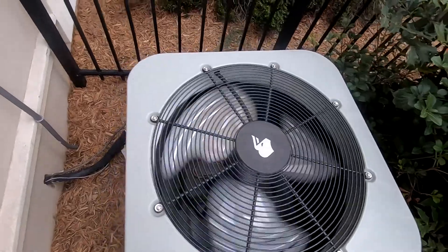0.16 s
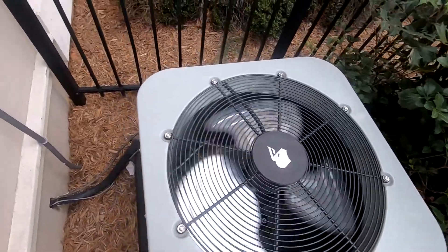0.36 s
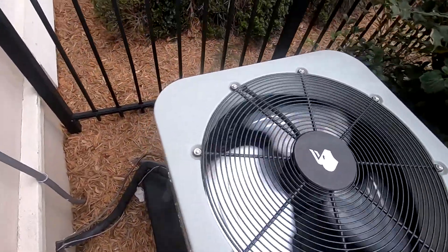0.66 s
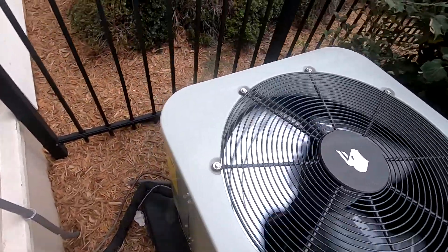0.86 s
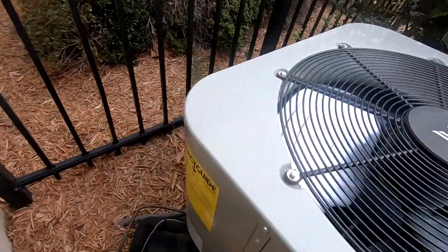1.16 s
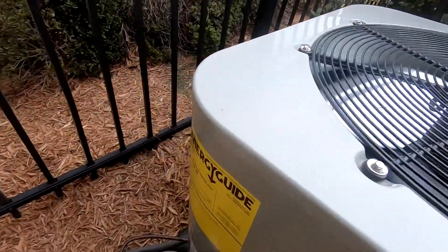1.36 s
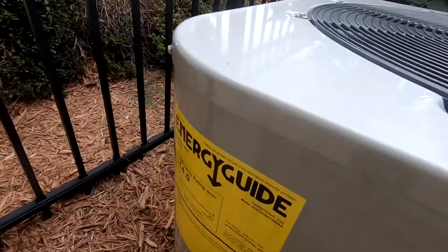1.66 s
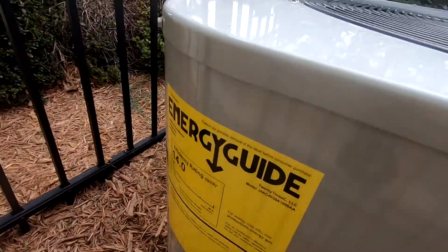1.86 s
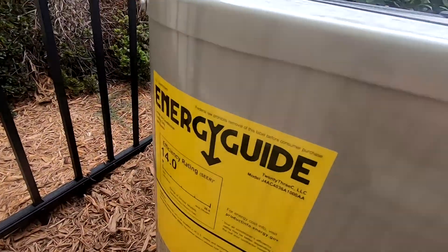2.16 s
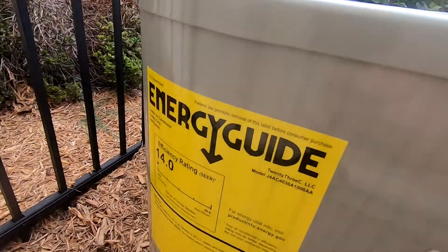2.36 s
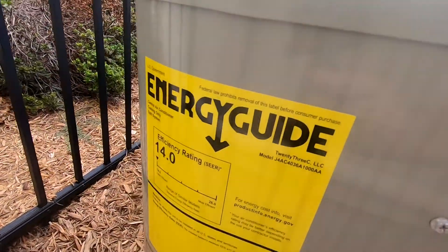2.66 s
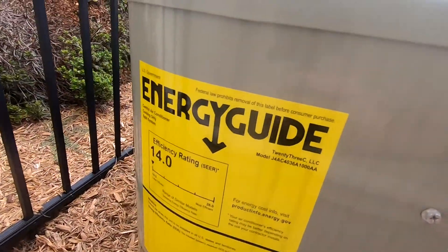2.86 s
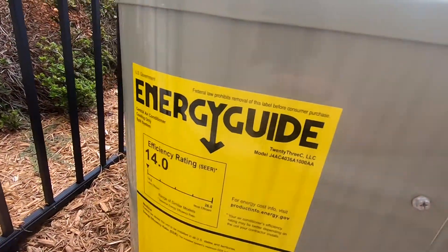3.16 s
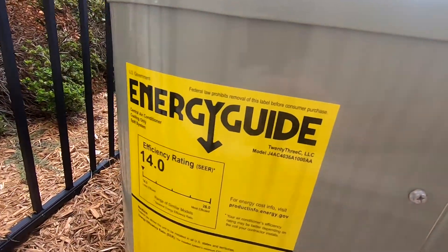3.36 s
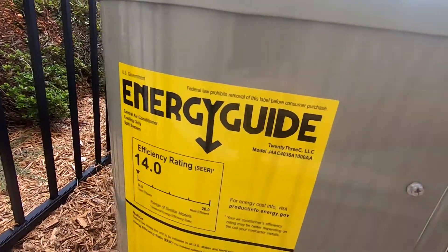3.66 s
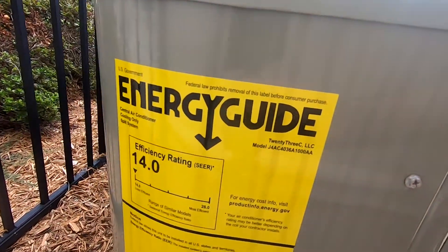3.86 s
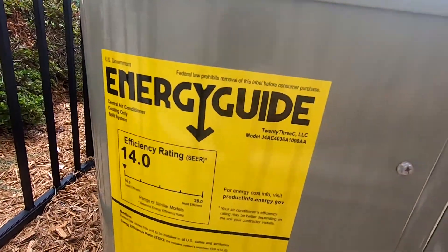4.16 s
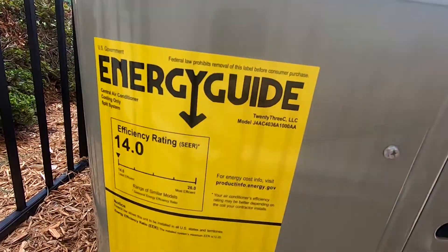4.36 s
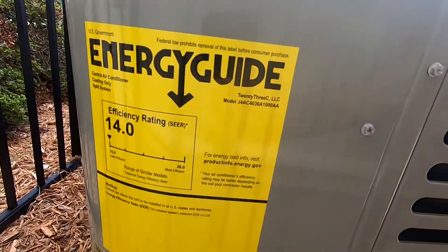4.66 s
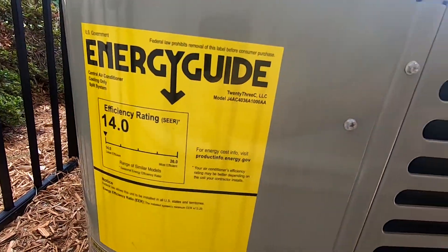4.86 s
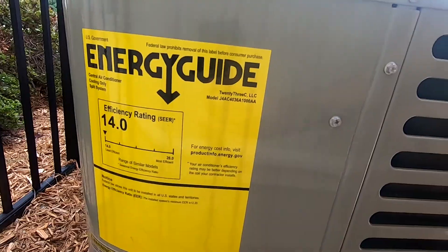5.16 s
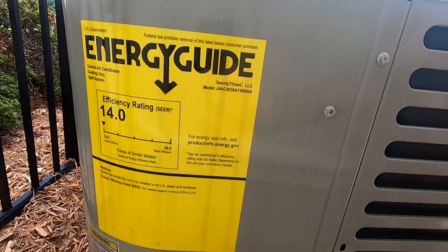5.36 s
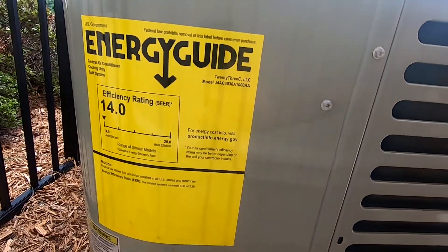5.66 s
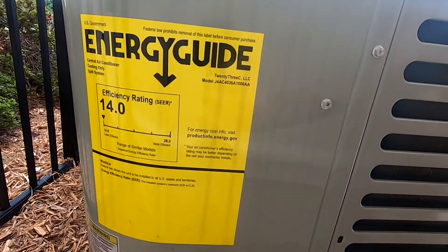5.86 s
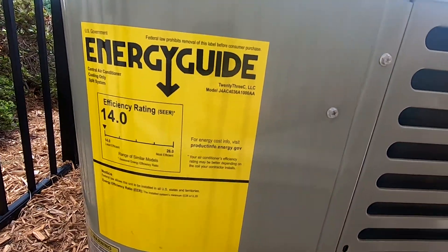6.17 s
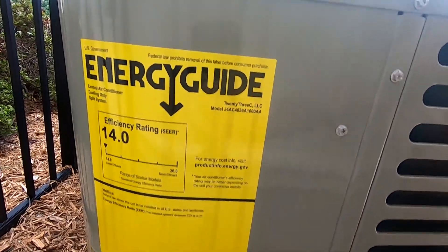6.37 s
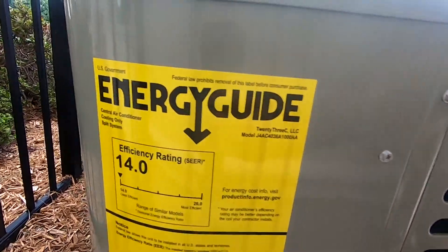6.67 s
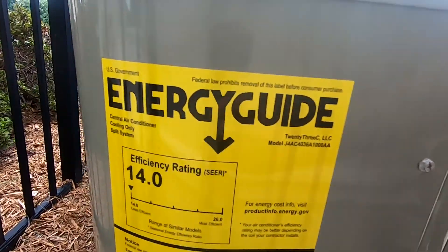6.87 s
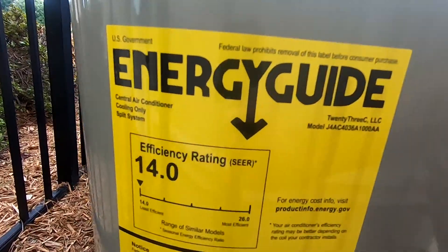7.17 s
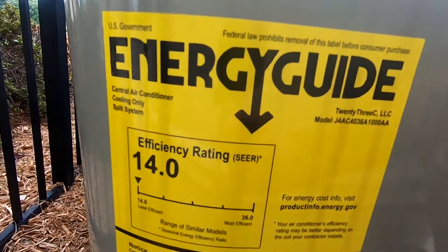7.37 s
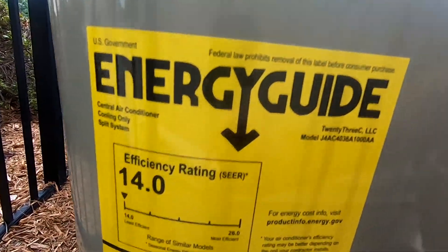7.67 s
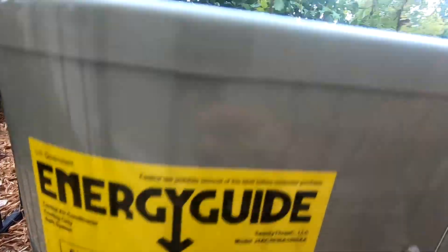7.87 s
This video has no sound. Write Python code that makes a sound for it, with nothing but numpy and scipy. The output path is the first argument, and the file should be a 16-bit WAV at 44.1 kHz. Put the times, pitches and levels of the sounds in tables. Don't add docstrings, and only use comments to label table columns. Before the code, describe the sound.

Rough blasts of fan air and handling knocks give way to the steady throb, buzz and airy hiss of an air conditioner outdoors.

```python
import sys
import numpy as np
from scipy import signal
from scipy.fft import rfft, irfft, next_fast_len
from scipy.io import wavfile
from scipy.ndimage import uniform_filter1d, map_coordinates

SR = 44100
rng = np.random.default_rng(int(sys.argv[2]) if len(sys.argv) > 2 else 0)


def transcribe(u):
    v = np.clip(np.atleast_2d(u).T, -1, 1)
    q = np.round(v * 32767).astype(np.int16)
    wavfile.write(sys.argv[1], SR, q)


def makeup_ratio(level_db):
    decades = np.asarray(level_db, float) / 20
    return 10 ** decades


N = 353682
TIME = np.arange(N) / SR
BLADE_HZ, SHAFT_HZ, HUM_HZ = 42.945, 59.142, 120.02


def unit(x):
    return x / np.sqrt(np.mean(x ** 2) + 1e-20)


def along(points, hz):
    f, v = np.transpose(points)
    return np.interp(np.log(hz + 1), np.log(f + 1), v)


def curves(rows):
    s, *cols = np.transpose(rows)
    return [np.interp(TIME, s, c) for c in cols]


def wobble(rate, part=slice(None)):
    knots = rng.standard_normal(int(N * rate / SR) + 4)
    return map_coordinates(knots, [TIME[part] * rate])


def filtered(x, response):
    m = next_fast_len(N + 8192)
    return irfft(rfft(x, m) * response(np.fft.rfftfreq(m, 1 / SR)), m)[..., :N]


def patchy(patchy_db):
    z = signal.stft(rng.standard_normal((2, N + 512)), nperseg=512)[2]
    field = uniform_filter1d(rng.standard_normal(z.shape[1:]), size=6, axis=0)
    field = uniform_filter1d(field, size=10, axis=1)
    return signal.istft(z * makeup_ratio(patchy_db * unit(field)), nperseg=512)[1][:, :N]


def coloured(noise, spectrum):
    return unit(filtered(noise, lambda hz: makeup_ratio(along(spectrum, hz))))


def evened(x, seconds):
    power = uniform_filter1d(x[0] ** 2, size=int(seconds * SR))
    return x / np.sqrt(np.abs(power) + 1e-9)


# start_s, level_db
CHIRPS = [
    (2.92, -53),
    (3.46, -49),
    (4.03, -46),
    (4.59, -45),
    (5.75, -47),
    (6.27, -52),
]


def cricket():
    pitch_hz, pulse_s, gap_s = 4250, .0045, .0165
    out, t = np.zeros(N + SR), np.arange(SR // 10) / SR
    pulses = sum(makeup_ratio(-1.5 * k) * np.exp(-((t - (k + .5) * gap_s) / pulse_s) ** 2) for k in range(4))
    for start_s, db in CHIRPS:
        out[round(start_s * SR):][:len(t)] += makeup_ratio(db + 4) * pulses * np.sin(2 * np.pi * pitch_hz * t)
    return out[:N]


# start_s, peak_db, pitch_hz
TICKS = [
    (.4015, -14, 755),
    (0.4463, -23, 780),
    (1.321, -34.5, 10400),
    (1.356, -26, 2500),
    (1.375, -16, 2600),
]


def ticks():
    out, t = np.zeros(N + SR), np.arange(SR // 50) / SR
    for start_s, db, hz in TICKS:
        out[round(start_s * SR):][:len(t)] += makeup_ratio(db - 60 * t * hz / 14) * np.sin(2 * np.pi * hz * t)
    return out[:N]


def hollow(hz, width_hz):
    ring = lambda f: (1j * f * width_hz / (hz ** 2 - f * f + 1j * f * width_hz)) ** 2
    return unit(filtered(rng.standard_normal(N), ring))


# time_s, level_db
RIM_LEVEL = [(.9, -55), (.98, -41), (1.1, -30), (1.35, -23.5), (1.55, -28), (1.75, -43), (2.1, -53)]
# time_s, level_db
SLOT_LEVEL = [(6.6, -65), (7.0, -53), (7.6, -49), (8.02, -50)]


def rim():
    turn = np.interp(TIME, (1.08, 1.46), (0, np.pi / 2))
    width_hz = 112
    glide = np.cos(turn) * hollow(665, width_hz) + np.sin(turn) * hollow(626, width_hz)
    return makeup_ratio(curves(RIM_LEVEL)[0]) * glide + makeup_ratio(curves(SLOT_LEVEL)[0]) * hollow(2710, 540)


# start_s, end_s, level_db, upper_part_over_it_db
GUSTS = [
    (0.053, 0.106, -18.5, -4),
    (0.132, 0.213, -10, -13.5),
    (0.28, 0.368, -10, -6.5),
    (0.428, 0.552, -10, -9),
    (0.587, 0.658, -10, -9.5),
    (.68, .715, -12, -12),
    (0.729, 0.759, -12, -1),
    (0.82, 0.83, -14.5, 0.5),
    (.84, .875, -19, -7),
]


def gusts():
    lull_db, lull_upper_db, edge_s = -13.5, -13.5 - 16.5, 0.026
    thud_db, flap_db = np.full(N, lull_db), np.full(N, lull_upper_db)
    for start, end, db, upper_db in GUSTS:
        on = np.clip(np.minimum(TIME - start, end - TIME) / edge_s + 1, 0, 1)
        thud_db = np.maximum(thud_db, lull_db + on * (db - lull_db))
        flap_db = np.maximum(flap_db, lull_upper_db + on * (db + upper_db - lull_upper_db))
    return thud_db, flap_db


# freq_hz, density_db
THUD_COLOUR = [(12, -35), (20, -10), (45, -3), (90, 0), (180, -3), (280, -11), (380, -30), (660, -120)]
FLAP_COLOUR = [(120, -39), (200, -2.5), (280, -5.5), (569, -18.5), (790, -19), (1500, -37), (1950, -63),
               (3300, -120)]


def buffeting():
    thud_db, flap_db = gusts()
    thud = makeup_ratio(thud_db - 3.5) * evened(coloured(rng.standard_normal((2, N)), THUD_COLOUR), .05)
    flap = makeup_ratio(3.1 * wobble(60.14)) * coloured(rng.standard_normal((2, N)), FLAP_COLOUR)
    leaving_jet = np.clip((.93 - TIME) / 0.089, 0, 1)
    return (thud + makeup_ratio(flap_db) * evened(flap, 0.092)) * leaving_jet


# middle_s, peak_db, length_ms, sign
SLAPS = [(.061, -7, 5, 1), (.0745, -6, 5, 1), (.085, -8, 3, 1), (.1215, -5, 4, 1), (.141, -7, 4, 1),
         (.156, -4, 4, 1), (.1665, -6, 5, 1), (.200, -4, 5, 1), (.2055, -9, 3, 1), (.2285, -8, 5, -1),
         (.254, -9, 3, 1), (.276, -6, 6, 1), (.285, -7, 5, -1), (.3015, -5, 4, 1), (.308, -6, 3, 1),
         (.316, -4, 6, -1), (.338, -3, 8, 1), (.360, -7, 5, 1), (.4045, -3, 3.3, 1), (.4487, -3, 3, 1),
         (.457, -7, 5, -1), (.4875, -6, 4, 1), (.5025, -3, 5, 1), (.522, -5, 4, 1), (.545, -7, 5, -1),
         (.5925, -2, 9, 1), (.625, -5, 6, 1), (.6705, -5, 5, -1), (.699, -3.5, 6, -1), (.7295, -9, 3, -1),
         (.7352, -7, 2.6, -1), (.7405, -8, 3, -1), (.7535, -7, 3, -1), (.7618, -7, 3, -1),
         (.7685, -7, 4, 1), (.811, -11, 16, 1), (.817, -9, 3, 1), (.839, -11, 4, -1)]


def slaps():
    out, calm = np.zeros(N), np.ones(N)
    for s, db, ms, sign in SLAPS:
        u = (TIME[:SR] - s) / (ms / 2000)
        out[:SR] += sign * makeup_ratio(db + 3.2) * np.tanh(3 * u) * np.exp(-u * u / 2)
        calm[:SR] *= 1 - .55 * np.exp(-u * u / 4)
    return out, calm


def ducking():
    slap_s, depth_db, attack_s, release_s = 0.402, -7, 0.018, 0.093
    late = TIME - slap_s
    attack = np.clip(1 + late / attack_s, 0, 1)
    release = np.exp(-np.abs(late) / release_s)
    return makeup_ratio(depth_db * np.where(late < 0, attack, release))


# freq_hz, density_db
BODY_TOP = [(15, -31.5), (36, -24.5), (55, -3), (140, 2.5), (200, -9.5), (290, -11.5), (400, -13),
            (700, -10.5), (880, -22), (980, -29), (1400, -45.5), (2400, -120)]
BODY_ONE = [(15, -26.5), (25, -8), (36, -14), (55, -1.5), (90, -3), (140, -4), (200, -5.5), (265, -13.5),
            (310, -15.5), (370, -10), (700, -18.5), (880, -23), (980, -25.5), (1400, -48.5), (2400, -120)]
BODY_PAIR = [(15, -31.5), (25, -12.5), (36, -12), (55, -14.5), (90, -1), (140, -10), (200, -7),
             (270, -17.5), (325, -18), (400, -14), (480, -15.5), (700, -18.5), (880, -25), (980, -28.5),
             (1400, -40), (2400, -120)]
# freq_hz, density_db
GRILLE_TOP = [(530, -28), (900, -2), (1250, -3.5), (1470, -4), (1670, -9.5), (1900, -7), (2400, -11.5),
              (2620, -11), (3550, -21.5), (4250, -23), (5800, -35.5), (7540, -56), (12800, -120)]
GRILLE_ONE = [(530, -26), (900, -9.5), (1100, -3), (1310, -5), (1450, -5), (1800, -9), (2200, -12),
              (3840, -21.5), (4180, -21), (5800, -31), (7540, -61), (12800, -120)]
GRILLE_PAIR = [(530, -23.5), (900, -4), (1010, -13), (1130, -1), (1280, -10.5), (1450, -6), (1770, -9),
               (3900, -21), (5800, -24.5), (7540, -52), (12800, -120)]
# freq_hz, density_db
HISS_TOP = [(2940, -29), (5000, -1), (5590, 1), (6180, -15), (7930, -7.5), (8600, -22), (9100, -22),
            (9700, -34), (10600, -20.5), (11200, -24.5), (12100, -32), (14000, -34), (15700, -40)]
HISS_ONE = [(2940, -23), (5000, -0.5), (5720, -3.5), (6420, -11.5), (8250, -7), (9100, -15.5),
            (9700, -24.5), (10700, -16.5), (11800, -27), (13400, -25.5), (15200, -39)]
HISS_PAIR = [(2940, -28), (5000, -2), (5440, -3), (6980, 3.5), (8180, -15.5), (8930, -8.5), (10300, -13),
             (11900, -25.5), (13900, -23.5), (15200, -31)]
# freq_hz, width_hz, boost_db
LOUVRES = [(4210, 270, 5), (5560, 200, -5), (1650, 99, 1.5)]
# time_s, level_db
FLOW = [(0, -30), (.33, -33), (.85, -35.5), (1.2, -31.5), (1.43, -29), (1.67, -31), (2.2, -36), (3.64, -36),
        (4.56, -37.5), (5.2, -36.5), (6.1, -34.5), (8.02, -33.5)]


def louvres(f):
    return makeup_ratio(sum(db / (1 + (2 * (f - hz) / width_hz) ** 2) for hz, width_hz, db in LOUVRES))


def airflow(width):
    (throb_db, cut_db), (grille_db,) = curves(THROB), curves(FLOW)
    top = np.clip((1.9 - TIME) / 0.93, 0, 1)
    shares = (top, (1 - top) * (1 - width), (1 - top) * width)

    def blend(noise, *colours):
        return sum(share * coloured(noise, c) for share, c in zip(shares, colours))

    body_db = throb_db - 13 + 0.11 * cut_db
    hiss_db = grille_db - 20.5 + 3 * (1 - top) + 8 * width ** 0.71
    blade = np.cos(2 * np.pi * BLADE_HZ * TIME - 1.5)
    puff = 0.78 * np.cos(2 * np.pi * (SHAFT_HZ * TIME - .63))
    puff = puff + 0.45 * np.cos(4 * np.pi * (SHAFT_HZ * TIME - .6))
    body = blend(patchy(patchy_db=0.92), BODY_TOP, BODY_ONE, BODY_PAIR)
    grille = filtered(blend(patchy(patchy_db=0.9), GRILLE_TOP, GRILLE_ONE, GRILLE_PAIR), louvres)
    hiss = blend(patchy(patchy_db=1.2), HISS_TOP, HISS_ONE, HISS_PAIR)
    body = makeup_ratio(body_db + 9 + 1.1 * blade) * body
    grille = makeup_ratio(grille_db + 2.5 + 0.8 * blade + 0.44 * puff) * grille
    return body + grille + makeup_ratio(hiss_db + 3.0 + 2.1 * puff) * hiss


# freq_hz, rms_per_line_db
VALVE_COMB = [(700, -74), (900, -60), (1800, -65.5), (3000, -63), (4500, -70.5), (6000, -76.5),
              (7500, -77.5), (10000, -91)]


def valves():
    size = 2048
    hz = np.arange(size // 2 + 1) * SHAFT_HZ
    uneven_db = rng.normal(0, 2.5, (6, len(hz))) + rng.normal(0, 1.2, len(hz))
    lines = makeup_ratio(along(VALVE_COMB, hz) + np.clip(uneven_db, -9, 2.5)) * ((hz > 600) & (hz < 10500))
    phase = 2 * np.pi * rng.random(len(hz)) * 0.87 + rng.normal(0, 1, lines.shape)
    shapes = irfft(lines * np.exp(1j * phase), size)
    place = (SHAFT_HZ * TIME + 0.0014 * wobble(3.09)) % 1 * size
    plays = np.array([np.interp(place, np.arange(size), one) for one in shapes]).reshape(3, 2, N)
    shares = np.array([makeup_ratio(12.0 * wobble(.8)) for _ in plays])
    shares = shares / np.linalg.norm(shares, axis=0)
    return (plays * shares[:, None]).sum(axis=0) * size / np.sqrt(2)


# middle_s,
# half_length_s, first_order, last_order, rms_db
SWELLS = [(2.2, .9, 8, 8, -37), (4.3, .9, 8, 8, -39), (6, 1, 8, 8, -40), (7.6, .8, 8, 8, -37),
          (5.6, 1, 17, 17, -48), (1.5, .6, 16, 16, -46), (2.6, .6, 16, 17, -44), (3.8, 1.3, 15, 17, -45),
          (7.5, .9, 15, 17, -43.5), (1.9, .6, 18, 18, -41), (3.3, 1.6, 18, 18, -40.5), (5, .6, 18, 18, -45),
          (7.2, 1.4, 18, 18, -41), (1.85, .4, 20, 20, -39), (3.4, 1.2, 20, 21, -47),
          (5.8, .95, 20, 20, -37), (5.6, 1.3, 23, 23, -51), (2.3, .7, 23, 25, -51), (1.35, .4, 25, 25, -46),
          (2.8, 2, 24, 25, -54), (1.4, .4, 37, 37, -51), (1.7, .5, 33, 33, -54), (3.6, .8, 24, 25, -51),
          (6.3, .7, 24, 24, -48), (5.8, 1.2, 25, 25, -43), (7.3, .6, 25, 25, -46), (3.9, 1, 27, 27, -46),
          (7.4, 1.2, 27, 27, -47),
          (3.3, 1.2, 33, 33, -54), (6.8, 1.6, 33, 33, -52), (5.9, .8, 36, 37, -55), (7.1, .6, 36, 37, -51),
          (6, 1, 39, 39, -53), (5.7, .7, 44, 44, -49.5), (7.42, .45, 44, 44, -45), (7.4, .5, 45, 46, -57),
          (7.3, .6, 49, 50, -57), (7.7, .6, 43, 43, -55), (3.6, 1, 48, 48, -55), (6.9, .8, 48, 48, -56),
          (1.95, .3, 70, 70, -58), (2.5, .3, 70, 70, -59), (3.6, .15, 70, 70, -58), (4.1, .15, 70, 70, -60),
          (4.55, .15, 70, 70, -58), (6.2, .35, 70, 70, -58), (7, .25, 70, 70, -55),
          (2.25, .25, 68, 68, -62), (1.7, .5, 92, 92, -63), (2.1, .6, 95, 97, -65), (3.6, .5, 97, 97, -65),
          (6.5, 1.4, 83, 83, -63), (5.9, .5, 109, 110, -64), (5.75, .3, 114, 115, -63),
          (7.6, .6, 114, 115, -62),
          (3, 1.2, 14, 14, -54), (4.6, .6, 14, 14, -50), (7, 1.3, 14, 14, -50), (5.5, 1.2, 15, 15, -44),
          (5.5, 1, 21, 21, -51), (4.9, .9, 24, 24, -52), (7.6, .6, 24, 24, -50), (4, 1, 28, 29, -56),
          (7.6, .7, 32, 32, -54), (7.3, 1, 34, 34, -53), (5.1, .9, 33, 33, -54), (5.4, .8, 38, 38, -55),
          (7.6, .5, 47, 47, -54), (6.5, 1.6, 51, 51, -56), (6.2, 1.5, 53, 53, -58), (7.2, .8, 59, 60, -60),
          (5.7, .8, 68, 68, -63), (3.5, .6, 76, 76, -62), (2, .8, 80, 80, -62), (2.8, 1.6, 84, 84, -65),
          (2.8, 1.6, 104, 104, -73), (4.7, .8, 48, 48, -55)]
# time_s, level_db
SHELL = [(0, -53), (1.1, -56), (1.55, -56), (1.95, -38.5), (2.5, -38), (3.03, -35.5), (4.09, -42.5),
         (5.09, -36), (7.45, -38.5), (8.02, -34.5)]


def compressor():
    both = np.zeros((2, N))
    for s, half, first, last, db in SWELLS:
        part = abs(TIME - s) < 2.5 * half
        t = TIME[part]
        for order in range(first, last + 1):
            turn = 2 * np.pi * order * (SHAFT_HZ * t - .3) + .15 * order * order + .25 * wobble(3.3, part)
            swell = makeup_ratio(db + 4.0 + 1.5 * wobble(3.5, part)) * np.exp(-((t - s) / half) ** 2)
            both[:, part] += swell * np.array([np.cos(turn), np.sin(turn)])
    turn = 2 * np.pi * 19 * SHAFT_HZ * TIME - .36 + .2 * wobble(3)
    shell = makeup_ratio(curves(SHELL)[0] + 5.0 + 1.3 * wobble(12))
    return both + shell * np.array([np.cos(turn), np.sin(turn)])


# time_s, throb_db, bass_cut_db
THROB = [(0, -12, -20.5), (.8, -22, -18), (.95, -13.5, -26), (1.05, -17, -22), (1.25, -12, -23),
         (1.4, -9, -19), (1.47, -3.5, -23), (1.55, -5.5, -11.5), (2.5, -8.5, -7.5), (3.7, -9.5, -4.5),
         (4.4, -12.5, -4), (6.5, -13.5, -3.5), (8.02, -11, -7.5)]
# multiple, beside_unit_db, extra_above_fan_db
BLADES = [(1, 3.5, 5), (2, -7, 2), (3, -6, -3), (4, -8.5, -1), (5, -14.5, -5.5), (6, -23, -3),
          (7, -47, -6.5)]
# multiple, level_db
PISTON = [(1, -19), (2, -19), (3, -24)]


def fan():
    level_db, cut_db = curves(THROB)
    above = np.clip(-cut_db / 15, 0, 1)
    turn = 2 * np.pi * BLADE_HZ * (TIME + 0.0022) + 0.0066 * wobble(0.86)
    throb = np.zeros(N)
    for k, db, more in BLADES:
        sign = 1 if k == 1 else -1
        level = makeup_ratio(db + more * above + 0.8 * wobble(4.5))
        throb += sign * level * np.cos(k * turn + 2.58 + 0.17 * wobble(2.414))
    for k, db in PISTON:
        throb += makeup_ratio(db + 0.57 * wobble(0.99)) * np.cos(2 * np.pi * k * SHAFT_HZ * TIME + k * k)
    throb += makeup_ratio(-3.5 + 0.63 * wobble(4.3)) * np.cos(2 * np.pi * HUM_HZ * TIME - 2.8)
    return np.sqrt(2) * makeup_ratio(level_db) * throb


def wind_guard(x):
    low = filtered(x, lambda hz: 1 / (1 + (hz / 150) ** 9.0))
    return x - low + makeup_ratio(curves(THROB)[1]) * low


# time_s, width_0_to_1
WIDTH = [(0, 0.12), (.4, 0.02), (.92, 0), (3.98, 0.01), (4.6, 0.43), (5.5, 0.76), (8.02, 0.87)]
# freq_hz, side_over_mid_db
APART = [(40, -24), (110, -18.5), (200, -22.5), (380, -35), (690, -5.5), (1280, 0), (2350, -2),
         (4330, -0.5), (7980, 5.5), (14700, 2)]
# freq_hz, left_over_right_db
LEAN = [(40, 0), (86, -2), (120, -0.5), (200, 0.4), (380, 3), (690, -2.5), (1280, -14.5), (2350, -8),
        (4330, -10.5), (7980, -15.5), (14700, 9.5)]
# freq_hz, left_leads_rad
LEAD = [(43, -0.12), (86, 0), (170, -.06), (300, 0)]


def lean(hz):
    return np.tanh(along(LEAN, hz) * np.log(10) / 40 + .5j * along(LEAD, hz))


def apart(hz):
    return np.sqrt(np.clip(makeup_ratio(2 * along(APART, hz)) - abs(lean(hz)) ** 2, 1e-6, None))


def scene():
    width = np.clip(curves(WIDTH)[0], 0, 1)
    flow_db, = curves(FLOW)
    reach = makeup_ratio(0.78 * (flow_db - flow_db.mean()) + 3 * width + 0.4)
    machine = (airflow(width) + compressor() + reach * valves()) * ducking() * makeup_ratio(-1.66)
    mid = wind_guard(machine[0] + fan()) + rim()
    side = width * (filtered(mid, lean) + filtered(machine[1], apart))
    wind, (slap, calm) = buffeting(), slaps()
    mid = mid + calm * wind[0] + slap + ticks() + cricket()
    side = side + 2.6 * width * wind[1]
    return np.array([mid + side, mid - side])


def top_cut(x):
    return signal.sosfilt(signal.butter(12, 15310, fs=SR, output="sos"), x)


def record(dry):
    x = filtered(dry, lambda hz: 1 / (1 + (11 / (hz + 1)) ** 4))
    mix = x / (1 + np.abs(x / .995) ** 8) ** (1 / 8)
    return top_cut(mix)


dry = scene()
out = record(dry)
transcribe(out)
```